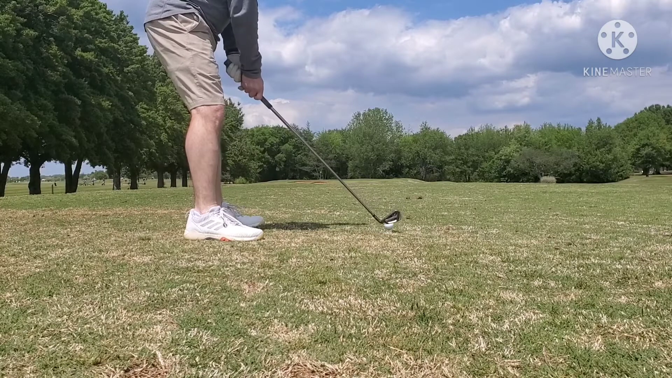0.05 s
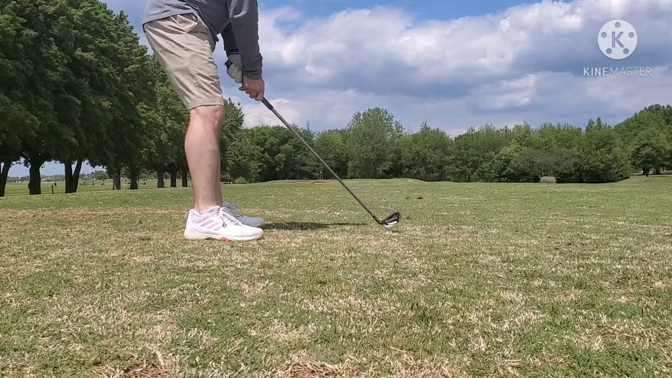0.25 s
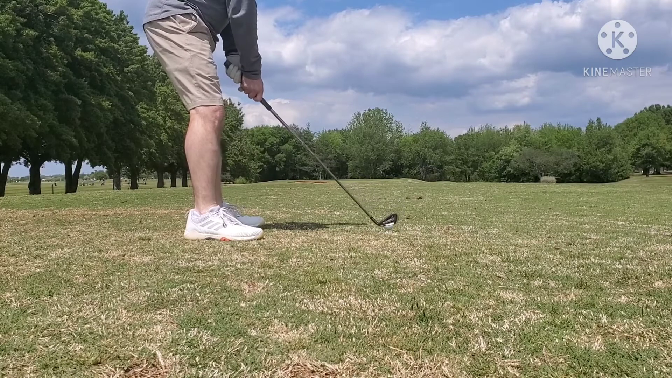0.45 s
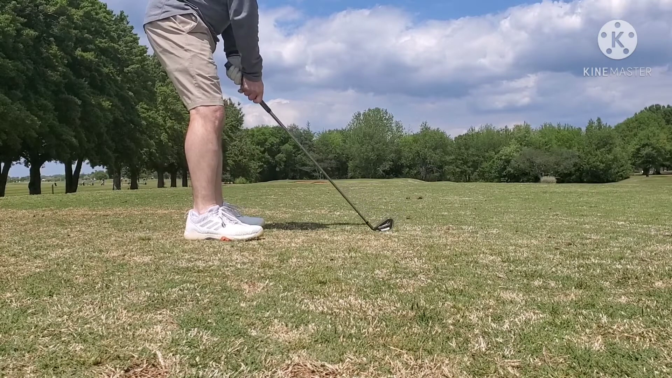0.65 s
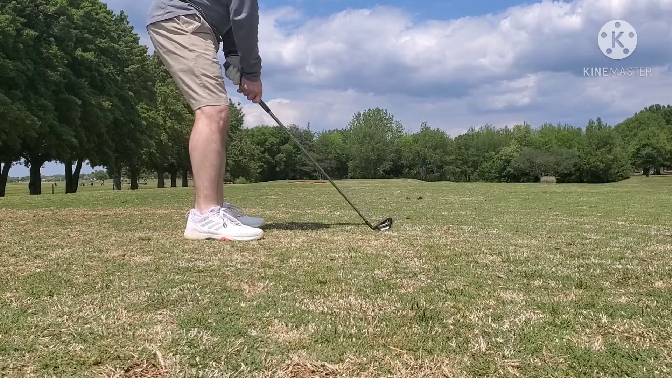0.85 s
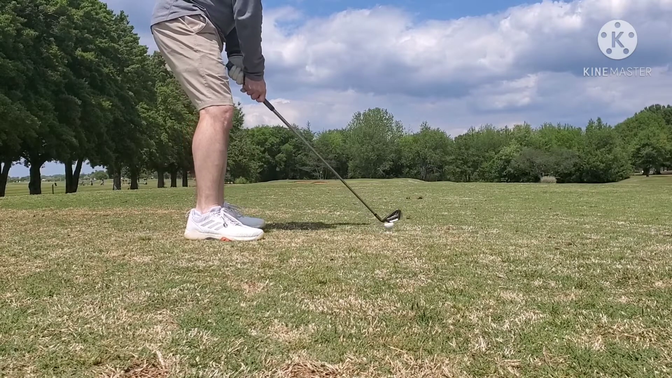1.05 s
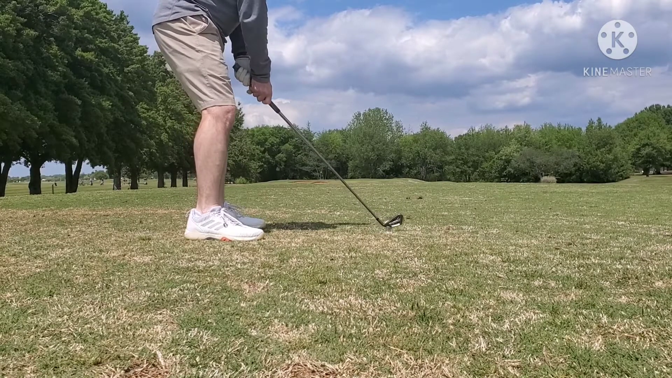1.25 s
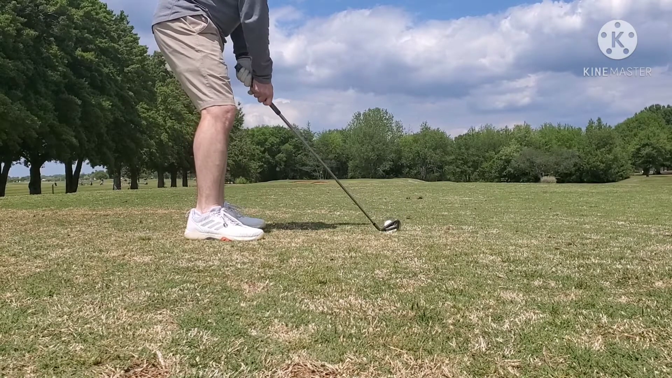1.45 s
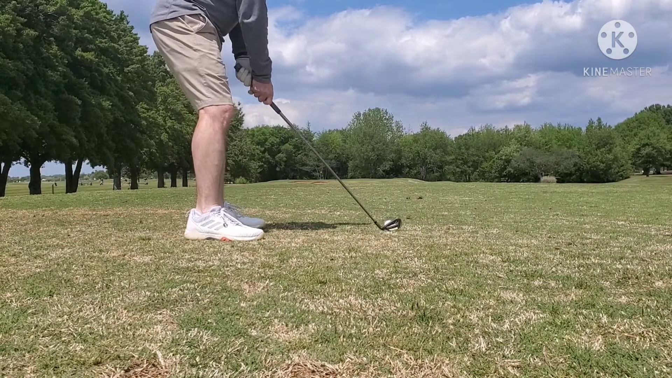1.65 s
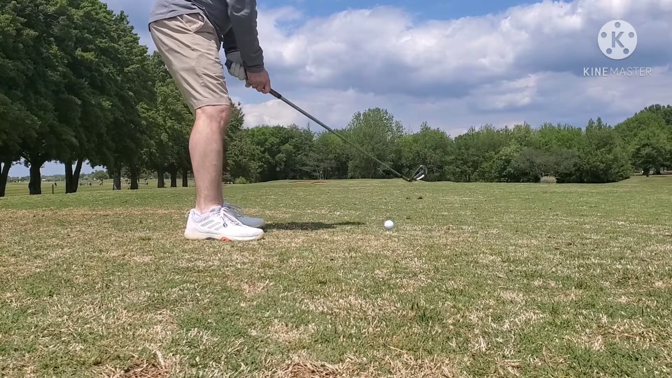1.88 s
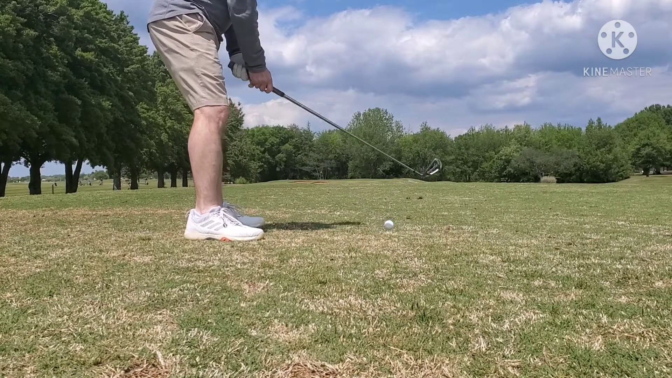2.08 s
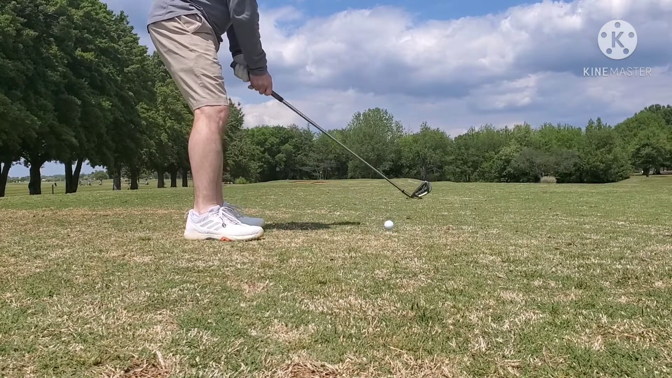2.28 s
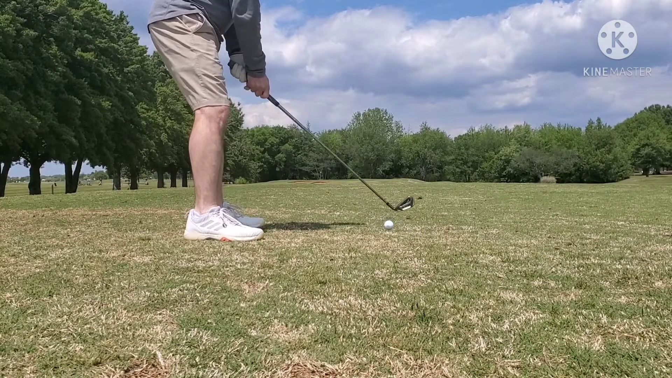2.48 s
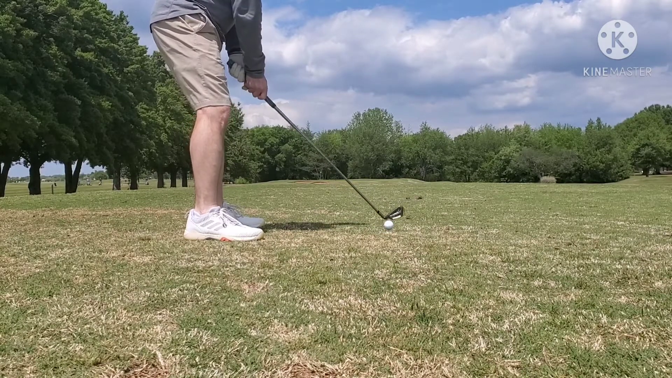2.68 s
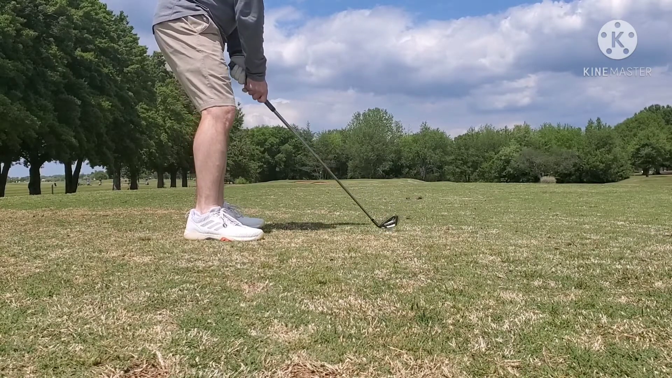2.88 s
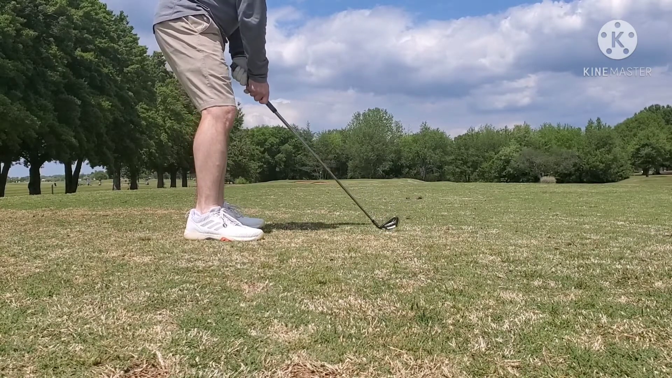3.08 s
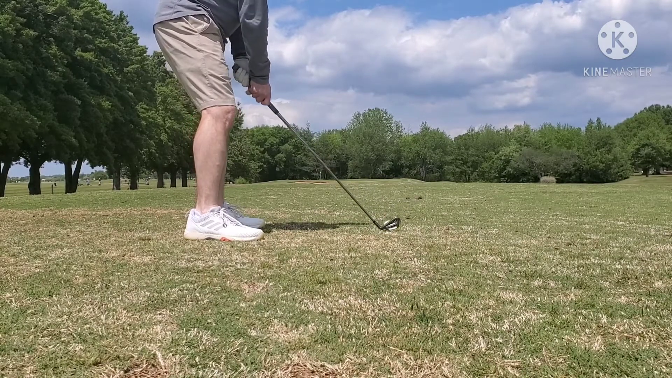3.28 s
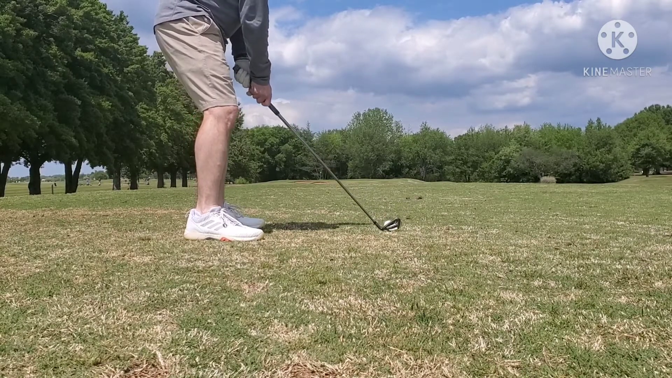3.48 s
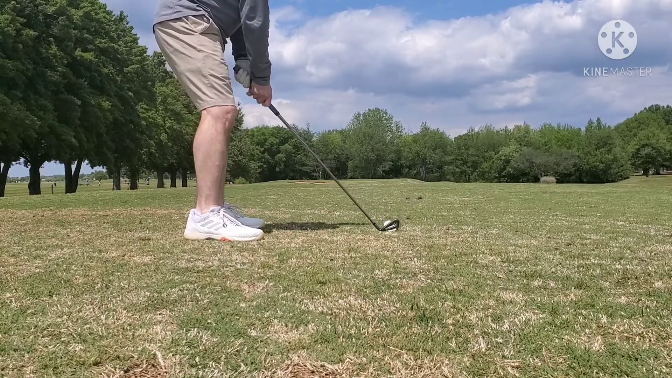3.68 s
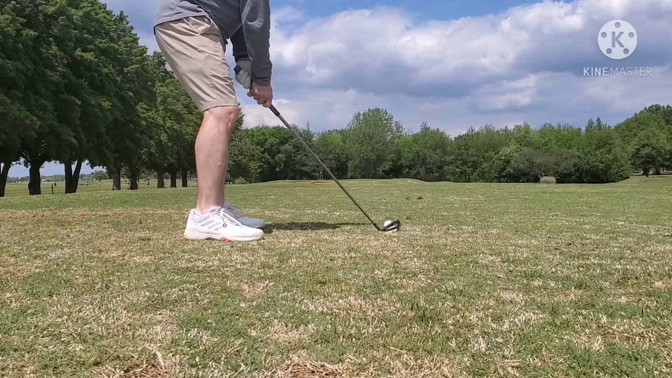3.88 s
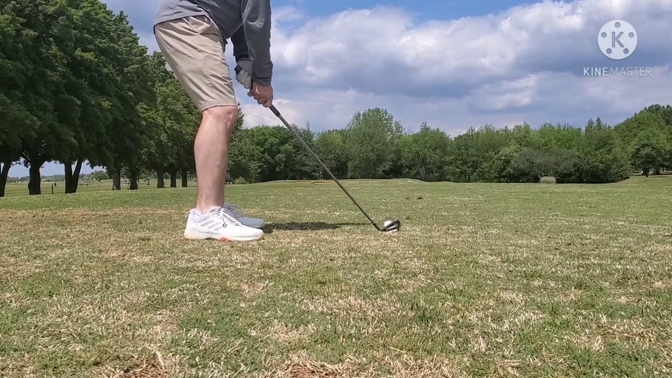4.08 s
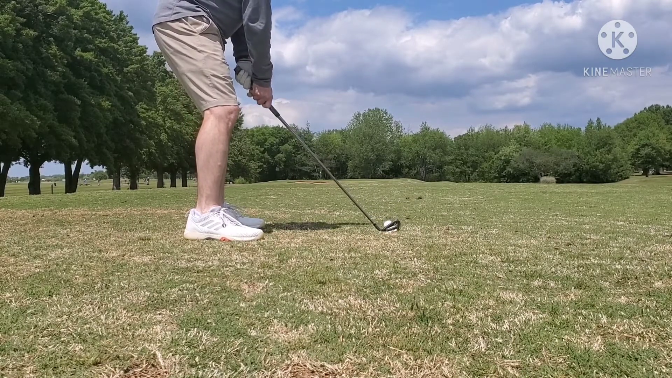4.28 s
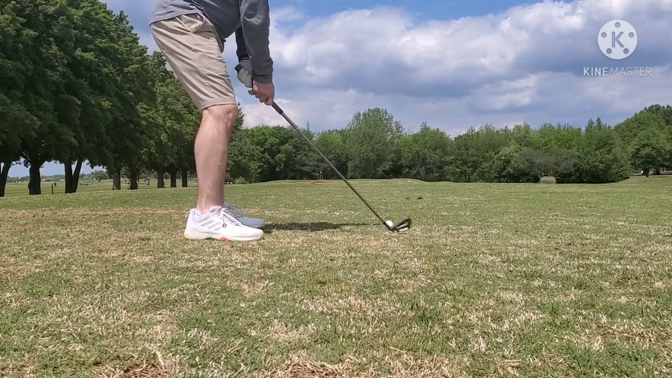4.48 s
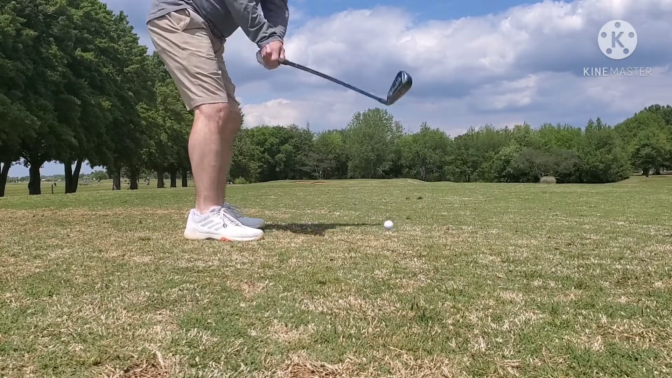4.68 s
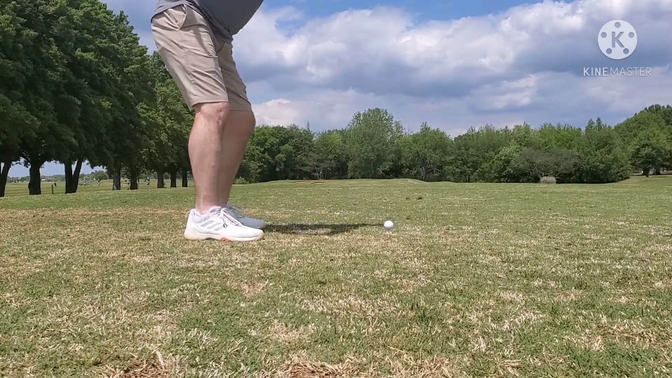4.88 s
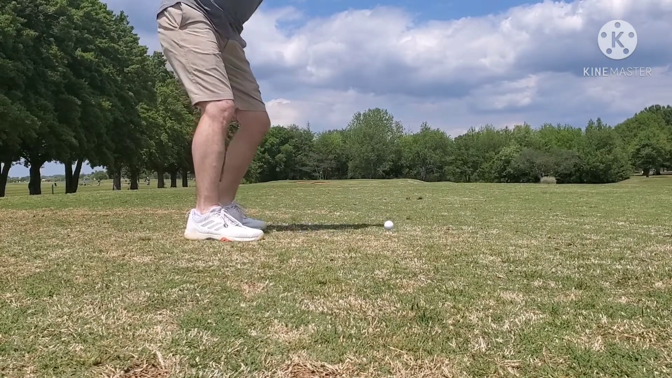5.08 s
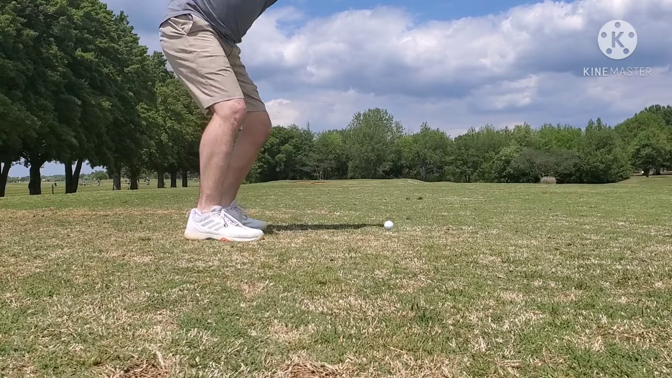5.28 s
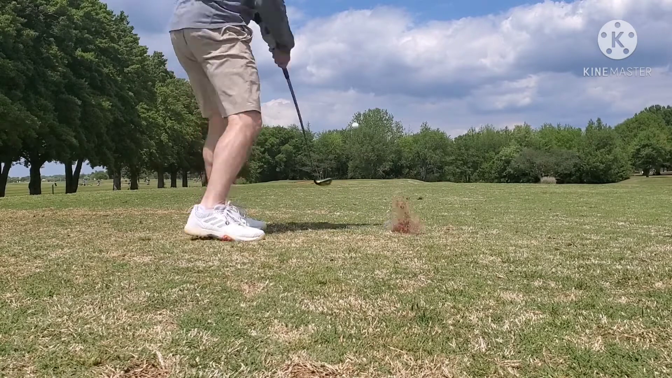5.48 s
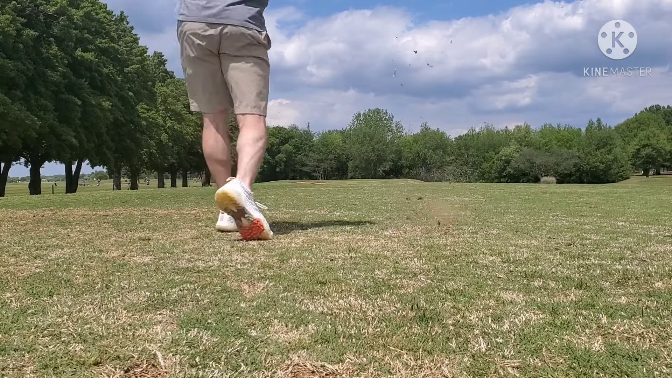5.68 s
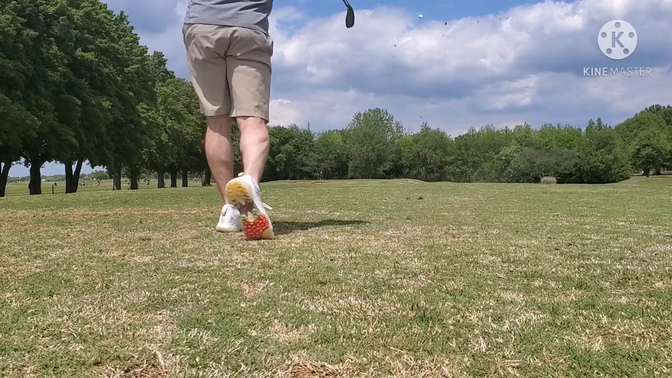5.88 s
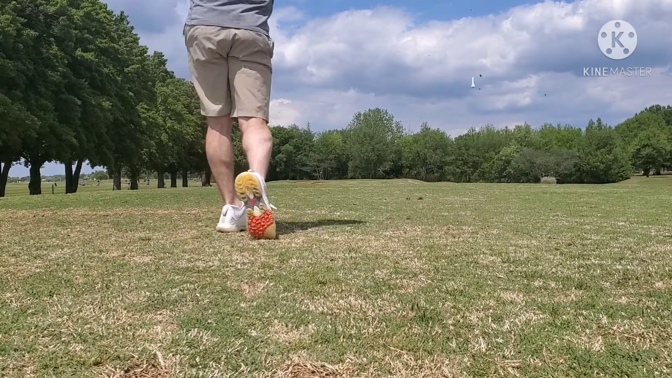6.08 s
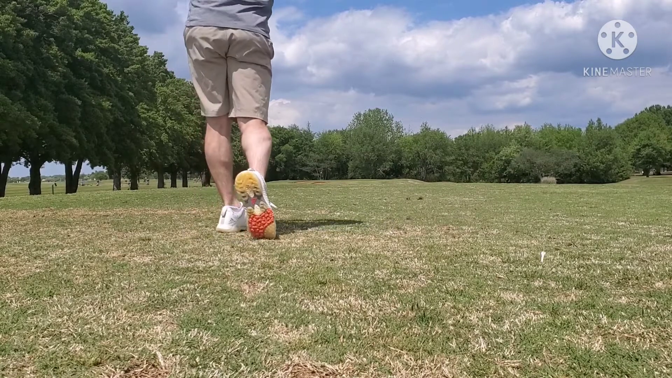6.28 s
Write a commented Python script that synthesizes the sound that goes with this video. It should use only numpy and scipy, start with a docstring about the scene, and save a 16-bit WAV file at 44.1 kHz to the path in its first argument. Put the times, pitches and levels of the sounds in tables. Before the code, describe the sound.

Outdoors on open grass near trees, a close songbird slightly left warbles quick varied whistles, then settles into a repeating flick, chirp and coo pattern. Wind buffets the microphone with soft low thumps, stronger on the right. A faint engine drone comes nearer after the middle. Near the end a club swishes, scuffs turf and clicks loudly on the ball, with soil pattering down while the bird sings on.

```python
"""A songbird to the left warbles, then chirps and coos, as wind buffets the ports; a far bird calls twice.
An engine drones, nearer from about 4 s. At 5.5 s a golf iron swishes, scuffs the turf, clicks on the ball;
soil and grass patter down. Birds are gliding sines with overtones and rasp; wind, engine, air and swish
are coloured noise; the click is a pressure swing plus decaying modes; crumbs are random band-passed grains."""
import sys
import numpy as np
from scipy import signal
from scipy.fft import rfft, irfft
from scipy.io import wavfile

SR = 44100
rng = np.random.default_rng(int(sys.argv[2]) if len(sys.argv) > 2 else 0)


def master_out(mix):
    """Clip the mix to full scale and print it as 16-bit PCM to the path in sys.argv[1]."""
    frames = np.transpose(np.atleast_2d(mix))
    ceiling = np.clip(frames, -1, 1)
    pcm = np.round(ceiling * 32767).astype(np.int16)
    wavfile.write(sys.argv[1], SR, pcm)


N = 279841
TIME = np.arange(N) / SR

# Noise colours, each scaled to rms 1 later: f/Hz, relative density/dB per Hz
AIR_COLOUR = [(1000, -5.5), (1800, -20.5), (3000, 2.5), (5800, -28.5), (7000, -18), (7900, -6), (9000, -24),
              (15000, -25.5)]
ENGINE_COLOUR = [(110, -18), (155, 2), (250, -6), (360, -6), (450, -7.5), (525, 1), (590, -7), (700, -27.5)]
WHINE_COLOUR = [(600, -3.5), (700, 8.5), (820, -3), (1150, -16.5), (1700, -12.5)]
WIND_COLOUR = [(20, -17.5), (55, 4.5), (75, 6), (165, -11), (250, -17), (480, -35.5), (800, -46)]
SWISH_COLOUR = [(300, 6.5), (600, 10), (1200, -1), (4300, -12), (6200, -18), (15000, -23.5)]

# Engine: gain/dB of drone and whine, before and after it draws near
ENGINE_FAR_DB, ENGINE_NEAR_DB = [-64.5, -79], [-49, -64.5]
ENGINE_NEARS_S, ENGINE_NEARS_OVER_S = 4.106, 0.2
# Engine surges: t/s, half-length/s, drone rise/dB, whine rise/dB
ENGINE_SURGES = [(3.15, 0.87, 4.5, 16), (4.72, 0.21, 9, 5.5), (5.25, 0.072, 7, 11.5), (6.0, 0.065, 5, 6)]

# Breeze between gusts: gain/dB of left port, right port
BREEZE_DB = [-39, -38.5]
# Gusts: t/s, half-length/s, left rise/dB, right rise/dB
GUSTS = [(0.063, 0.26, 1, 13.5), (1.516, 0.66, 3.5, 13), (2.52, 0.2, 6.5, 10), (3.129, 0.21, 2, 9.5),
         (4.092, 0.37, -0.5, 9.5), (4.666, 0.15, 5.5, 6.5), (5.26, 0.2, 4.5, 11),
         (6.103, 0.069, -3.5, 11.5)]
# Single buffets on the right port: t/s (crest 16 ms later), relative level/dB
BUFFETS = [(0.086, -13.5), (0.242, -18.5), (1.363, -17), (1.615, -16.5), (1.688, -16), (2.395, -20),
           (2.567, -11), (4.041, -19.5), (4.14, -21)]

# Glides of each bird call: t from the call's mark/s, length/s, from f/Hz, to f/Hz,
# ease (1 straight, >1 fast then settling), skew (<1 peaks early), level before call gain/dB
TWITTER = [(0, 0.036, 2180, 2940, 1.7, 0.5, -49.5), (.003, 0.027, 4300, 6250, 0.57, 0.73, -56.5),
           (.022, 0.025, 3500, 4770, 1.9, 0.82, -51.5), (.032, 0.032, 3770, 2190, 1.7, 0.62, -48),
           (.056, 0.039, 2320, 3220, 5.8, 1, -43)]
HOOK = [(0, 0.025, 2880, 2370, 1.07, 1.5, -51), (.022, 0.01, 2670, 3680, 1.1, 1.3, -53),
        (.031, .028, 3900, 3250, 1.5, .6, -51)]
RISE = [(0, 0.039, 2632, 2480, 0.96, .75, -37.5), (.04, 0.044, 2573, 3570, 0.92, 0.7, -36)]
SCOOP = [(0, 0.06, 2840, 2243, 3.5, 0.8, -38.5), (.072, 0.04, 2280, 2695, 1, 1.14, -37.5),
         (.106, .016, 3465, 2700, 1.8, .7, -48), (.117, 0.032, 2640, 3440, 0.73, 0.47, -41.5)]
PEEP_SLUR = [(0, 0.042, 4313, 4613, 2, 1, -43.5), (.028, 0.011, 4530, 5180, 1, 0.95, -59),
             (.05, 0.036, 4150, 2900, 1.3, 0.68, -38.5)]
SWEEP = [(0, 0.059, 2350, 2760, 0.88, 1.2, -43), (.045, 0.06, 2770, 4754, 3.3, 0.32, -44.5)]
CHIRP = [(.004, .037, 1681, 2661, 2.06, 1.22, -40.5), (.056, .096, 3373, 3867, 1.9, 1.105, -34)]
FLICK = [(.002, 0.013, 3623, 5010, 1.4, 0.88, -42), (.018, 0.013, 4640, 3414, 2.3, 1, -38.5)]
COO = [(.005, 0.034, 2796, 2462, 0.84, 0.65, -48.5), (.034, 0.042, 2864, 2910, 1.5, 0.8, -48.5)]
FAR_SLUR = [(0, 0.07, 6410, 5870, 0.7, 0.8, -64), (.03, 0.15, 5980, 3616, 3.4, 0.73, -57.5)]
# Marks of each call: t/s, call gain/dB, pitch ratio (only where it varies)
TWITTERS = [(-.037, -3.5), (0.116, -5.5), (0.277, -6), (0.437, -4.5)]
HOOKS = [(0.711, 0.0092), (.92, 0.0063)]
RISES = [(0.585, -23), (1.087, -18), (2.558, -7), (3.232, -25.5)]
SCOOPS = [(1.318, -6), (1.606, -6), (1.901, -3.5), (2.222, -3.5)]
PEEP_SLURS = [(1.185, -9.5, 1), (1.463, -4.5, .985), (1.758, -2, 1.003), (2.058, -3, 1), (2.378, 0, .995),
              (2.666, 1, 1.02)]
SWEEPS = [(2.879, 0.023)]
CHIRPS = [(3.489, -3.5), (3.807, -1.5), (4.152, -0.5), (4.504, 1), (4.864, 0.5), (5.224, 2), (5.596, 0.5),
          (5.962, 0.5)]
FLICKS = [(3.125, -22.5), (3.346, -9.5), (3.636, 0), (3.963, 1.5), (4.312, 3.5), (4.666, 4), (5.027, 5),
          (5.388, 5), (5.758, 4), (6.124, 4)]
COOS = [(3.382, -5.5), (3.68, -1), (4.001, 2.5), (4.348, 2.5), (4.705, 3.5), (5.063, 2.5), (5.426, 4.5),
        (5.795, 4), (6.164, 3.5)]
FAR_SLURS = [(.005, -1.5), (0.809, -1.3)]
# Harmonics 2, 3, 4 of a loud note: level before colour/dB
OVERTONES_DB = [-24.5, -33.5, -52]
# Lift of an overtone by its own frequency: f/Hz, lift/dB
OVERTONE_COLOUR = [(4000, 24), (5200, -17), (5800, -4), (6500, -6.5), (7600, 3), (9000, 10.5),
                   (10000, -4.5), (11400, 1), (15000, 11.5)]
SWELL_POWER = 0.92  # exponent on a glide's sine arch

# Downswing: t/s, swish gain/dB
SWING = [(5.34, -89), (5.41, -55.5), (5.445, -43), (5.465, -42.5), (5.505, -42.5), (5.55, -75)]
# Falling soil and grass: t/s, patter gain/dB
CRUMBS = [(5.48, -100), (5.505, -65), (5.555, -78), (5.582, -66.5), (5.64, -64), (5.79, -100)]
# Crumbs of three sizes: low f/Hz, high f/Hz, relative level/dB
CRUMB_BANDS = [(1000, 2900, 0), (3760, 4800, 9), (5000, 9000, 1.5)]

# Modes of club and ball: f/Hz, level/dB, t60/s
CLUB_MODES = [(290, -27, .025), (545, -22.5, .022), (1380, -15, .016), (1640, -22, .016), (3000, -17, .013),
              (4020, -6.5, .012), (5150, -15, .009), (8050, -27, .024)]
# Blade through the turf: t/s, level/dB, rise/s, decay/s, low f/Hz, high f/Hz
SCUFFS = [(5.4823, -17.5, 0.0013, 0.0028, 417, 1100), (5.489, -25, 0.0012, 0.0017, 2500, 5880),
          (5.5016, -27.5, 0.0012, 0.0012, 3300, 5300)]
HIT_S = 5.4869  # face meets ball
PUSH_DB, PUSH_S = -8.5, .00012  # pressure swing: height, half-width
BOUNCE_DB, BOUNCE_S = -8.5, .00133  # inverted turf reflection: level, delay


def from_db(db):
    """Amplitude ratio of a level in dB."""
    return 10 ** (np.asarray(db) / 20)


def rms_one(x):
    """Scale to rms 1."""
    return x / np.sqrt(np.mean(x ** 2) + 1e-20)


def in_time(rows):
    """Level curve of (t/s, level/dB) rows, joined by straight lines."""
    s, db = np.transpose(rows)
    return np.interp(TIME, s, db)


def swells(rows):
    """Bell-shaped rises in dB, summed; one curve per level column."""
    return sum(np.outer(rise_db, np.exp(-((TIME - s) / width_s) ** 2)) for s, width_s, *rise_db in rows)


def band(x, low_hz, high_hz, order=2):
    """Band-pass; order 1 has gentle skirts."""
    sos = signal.butter(order, [low_hz, min(high_hz, .45 * SR)], "band", fs=SR, output="sos")
    return signal.sosfilt(sos, x + 1e-18)


def noise(colour):
    """Noise of a given colour at rms 1, falling 30 dB per octave past its ends."""
    hz, db = np.transpose(colour)
    octave, knots = np.log2(np.fft.rfftfreq(N, 1 / SR) + 1), np.log2(hz)
    skirt_db = -30 * np.abs(octave - np.clip(octave, knots[0], knots[-1]))
    shape = from_db(np.interp(octave, knots, db) + skirt_db)
    return rms_one(irfft(rfft(rng.standard_normal(N)) * shape, N))


def drift(rate_hz):
    """Smooth random curve of rms 1, low-passed near rate_hz."""
    coarse = TIME[::16]
    hz = np.fft.rfftfreq(len(coarse), coarse[1])
    spectrum = rfft(rng.standard_normal(len(coarse))) / (1 + (hz / rate_hz) ** 4)
    return np.interp(TIME, coarse, rms_one(irfft(spectrum, len(coarse))))


def from_side(x, pan_db, lag):
    """Right port hears x lag samples later; pan_db is left level over right."""
    right = np.pad(x, (lag, 0))[:N]
    return np.array([x * from_db(pan_db / 2), right * from_db(-pan_db / 2)])


def trees(x, t60_s, build_s):
    """Trunks, leaves and grass scatter a diffuse echo, different at each port."""
    t = TIME[:SR]
    echo = rng.standard_normal((2, SR)) * from_db(-60 * t / t60_s) * (1 - np.exp(-t / build_s))
    echo /= np.sqrt(np.sum(echo[0] ** 2))
    return signal.fftconvolve(x[None], echo, axes=1)[:, :N]


def air():
    """Faint hiss of leaves and air, independent at each port."""
    return from_db(-74.0) * np.array([noise(AIR_COLOUR), noise(AIR_COLOUR)])


def engine():
    """Drone and whine of coloured noise, rising as the engine nears and surges, partly scattered."""
    nearness = .5 + .5 * np.tanh((TIME - ENGINE_NEARS_S) / ENGINE_NEARS_OVER_S)
    level_db = np.outer(ENGINE_FAR_DB, 1 - nearness) + np.outer(ENGINE_NEAR_DB, nearness)
    drone_db, whine_db = level_db + swells(ENGINE_SURGES)
    drone = from_db(drone_db + 2.3 * drift(13)) * noise(ENGINE_COLOUR)
    whine = from_db(whine_db) * noise(WHINE_COLOUR)
    spread = from_db(-12) * trees(drone + whine, t60_s=.5, build_s=.02)
    return from_side(drone + whine, pan_db=-1.0, lag=14) + spread


def wind(lumpy_db=4.0, buffet_s=0.016):
    """Each port has its own eddies under shared gust times; single buffets push the right port."""
    ports = np.array([noise(WIND_COLOUR) * from_db(calm_db + gust_db + lumpy_db * drift(14.2))
                      for calm_db, gust_db in zip(BREEZE_DB, swells(GUSTS))])
    push = sum(from_db(db) * np.exp(-((TIME - s - buffet_s) / buffet_s) ** 2) for s, db in BUFFETS)
    ports[1] += 0.69 * push * noise([(50, 6), (85, 2.5), (220, -4.0), (600, -36.0)])
    return ports


def glides(*calls):
    """Spell calls out as glides, each at its own time, level and, where given, pitch."""
    song = []
    for call, marks in calls:
        for s, call_db, *pitch in marks:
            ratio = np.prod(pitch)  # 1 if none given
            for after, length, from_hz, to_hz, ease, skew, db in call:
                song.append((s + after, length, from_hz * ratio, to_hz * ratio, ease, skew, call_db + db))
    return song


def sing(song, waver, waver_hz, flutter_db, bright_db, loud_db=-36, rasp_db=-29, fast_hz_per_s=90000):
    """A trembling whistle follows each glide; loud notes gain overtones, fast glides rasp."""
    out, flutter = np.zeros(N), flutter_db * drift(62)
    tremble = 1 + waver * drift(waver_hz) + 0.0072 * drift(11.0)
    rasp = from_db(rasp_db) * rms_one(band(rng.standard_normal(N), 2100, 13000))
    for start, length, from_hz, to_hz, ease, skew, db in song:
        on = (TIME > start) & (TIME < start + length)
        part = np.clip((TIME[on] - start) / length, 0, 1)
        hz = to_hz + (from_hz - to_hz) * (1 - part) ** ease
        swell = np.abs(np.sin(np.pi * part ** skew)) ** SWELL_POWER
        phase = 2 * np.pi * np.cumsum(hz * tremble[on]) / SR
        effort = np.minimum(swell * from_db(db - loud_db), 1)
        speed = min(abs(to_hz - from_hz) / length / fast_hz_per_s, 1)
        tone = np.sin(phase) + effort * rasp[on] * speed ** 2
        for k, overtone_db in enumerate(OVERTONES_DB, 2):
            lift_db = bright_db + np.interp(k * hz, *np.transpose(OVERTONE_COLOUR))
            tone += effort * from_db(overtone_db + lift_db) * np.sin(k * phase)
        out[on] += tone * swell * from_db(db + flutter[on])
    return out


def birds():
    """Near bird sings from the left with early, late and tree-line echoes; the far one buzzes, all echo."""
    warbles = glides((TWITTER, TWITTERS), (HOOK, HOOKS), (RISE, RISES), (SCOOP, SCOOPS),
                     (PEEP_SLUR, PEEP_SLURS), (SWEEP, SWEEPS))
    chirps = glides((CHIRP, CHIRPS), (FLICK, FLICKS))
    slurs = glides((FAR_SLUR, FAR_SLURS))
    warbling = sing(warbles, waver=0.0066, waver_hz=150, flutter_db=3.0, bright_db=-1)
    chirping = sing(chirps, waver=0.0057, waver_hz=120, flutter_db=1.53, bright_db=-1.5)
    cooing = sing(glides((COO, COOS)), waver=0.0033, waver_hz=120, flutter_db=3.5, bright_db=14)
    far = sing(slurs, waver=0.035, waver_hz=350, flutter_db=7.0, bright_db=-11.5)
    near = warbling + chirping + cooing
    early = from_db(-3.0) * trees(warbling, t60_s=0.059, build_s=0.0017)
    early += from_db(-6.5) * trees(chirping + cooing, t60_s=0.057, build_s=0.01)
    late = trees(from_db(-23.0) * warbling + from_db(-23.5) * chirping, t60_s=0.13, build_s=0.049)
    high_peeps = band(warbling, 4300, 4500)
    lingering = trees(from_db(-13) * cooing + from_db(-22.5) * high_peeps, t60_s=.5, build_s=0.051)
    delayed = np.interp(TIME - 0.105, TIME, near, left=0)  # one distinct echo off the wood's edge
    edge = from_db(-30) * trees(delayed, t60_s=0.22, build_s=.003)
    distant = from_db(-4.0) * trees(far, t60_s=0.29, build_s=0.0045)
    return from_side(near, pan_db=4.5, lag=23) + early + late + lingering + edge + distant


def crumbs(crumbs_per_s=1500, size_db=2.5):
    """Soil and grass patter down: random grains per port, band-passed by crumb size."""
    patter = 0
    for low_hz, high_hz, db in CRUMB_BANDS:
        grains = (rng.random((2, N)) < crumbs_per_s / SR) * rng.standard_normal((2, N))
        sized = grains * from_db(size_db * drift(50))
        patter = patter + from_db(db) * rms_one(band(sized, low_hz, high_hz))
    return from_db(in_time(CRUMBS)) * patter


def swing(eddy_db=3.5):
    """Air rushes round the shaft in eddies: noise partly shared by the ports."""
    rush = noise(SWISH_COLOUR) + .5 * np.array([noise(SWISH_COLOUR), noise(SWISH_COLOUR)])
    return from_db(in_time(SWING)) * rush * from_db(eddy_db * drift(120))


def scuffs():
    """The blade tears through turf: band-passed noise bursts with exponential rise and decay."""
    out = np.zeros(N)
    for s, db, rise_s, decay_s, low_hz, high_hz in SCUFFS:
        shape = np.exp(-np.minimum(np.maximum((s - TIME) / rise_s, (TIME - s) / decay_s), 20))
        out += from_db(db) * shape * rms_one(band(rng.standard_normal(N), low_hz, high_hz, order=1))
    return out


def click(crack_db=-17, crack_s=0.0034):
    """The blow sends one pressure swing and rings the modes under a crack; turf reflects it inverted."""
    t = np.maximum(TIME - HIT_S, 0)
    blow = np.zeros(N)
    for k, (hz, mode_db, t60_s) in enumerate(CLUB_MODES):
        decay = from_db(np.maximum(mode_db - 60 * t / t60_s, -200))
        blow += (-1) ** k * decay * np.sin(2 * np.pi * hz * t)
    leap = (TIME - HIT_S) / PUSH_S - .5
    blow += from_db(PUSH_DB) * leap * np.exp((1 - leap ** 2) / 2)
    bounce = -from_db(BOUNCE_DB) * np.interp(TIME - BOUNCE_S, TIME, blow)
    crack_shape = (t > 0) * np.exp(-np.minimum(t / crack_s, 20))
    crack = from_db(crack_db) * crack_shape * rms_one(band(rng.standard_normal(N), 1500, 11000))
    return blow + bounce + crack


def strike():
    """Click and scuffs together; grass scatters the treble at once, a long faint tail follows."""
    hit = click() + scuffs()
    ground = from_db(-1) * trees(band(hit, 2000, 15400), t60_s=0.0072, build_s=0.0015)
    tail = from_db(-31.5) * trees(band(hit, 394, 4010), t60_s=0.99, build_s=0.024)
    return from_side(hit, pan_db=-1.0, lag=2) + ground + tail


def scene():
    """Sum of all layers."""
    return birds() + wind() + engine() + air() + strike() + swing() + crumbs()


def record(dry, ceiling=.95, cutoff_hz=16000):
    """Recorder rounds off the peaks, fades both ends in about 10 ms and cuts the top steeply."""
    rounded = ceiling * np.tanh(dry / ceiling)
    edges = signal.windows.tukey(N, .003)
    low_pass = signal.ellip(10, .2, 80, cutoff_hz, fs=SR, output="sos")
    return signal.sosfilt(low_pass, rounded * edges)


dry = scene()
out = record(dry)
master_out(out)
```